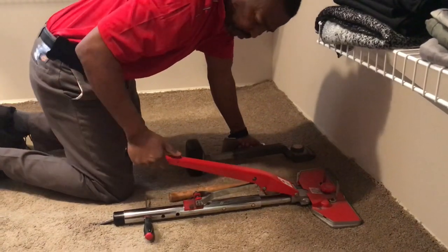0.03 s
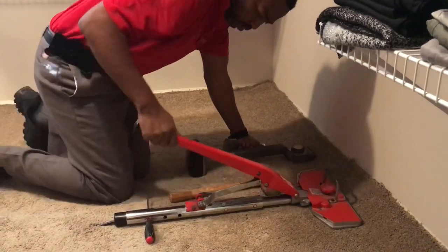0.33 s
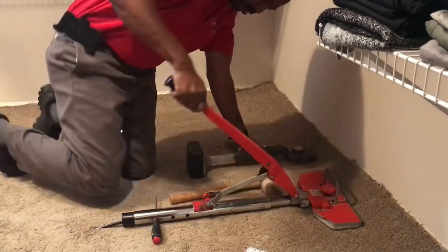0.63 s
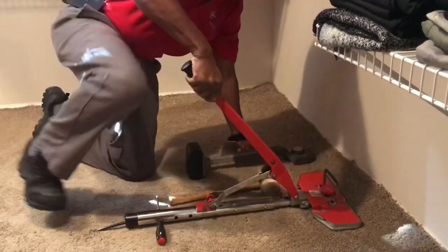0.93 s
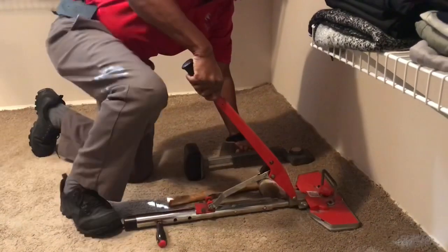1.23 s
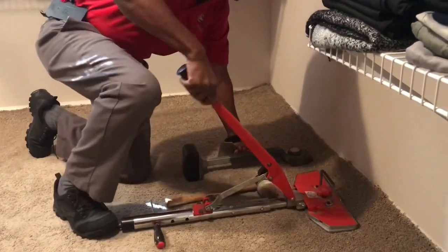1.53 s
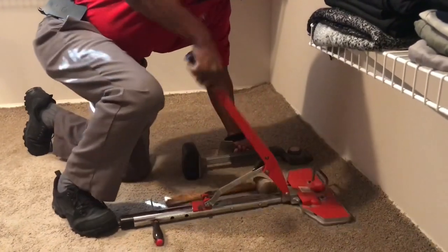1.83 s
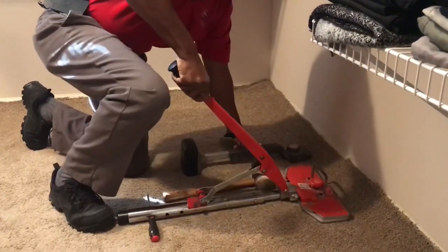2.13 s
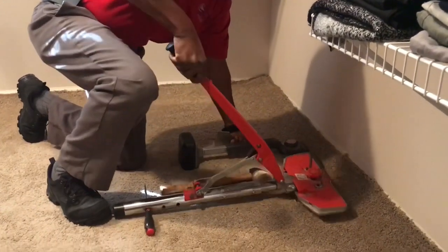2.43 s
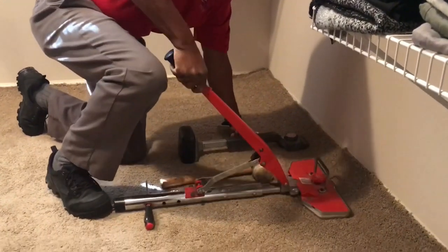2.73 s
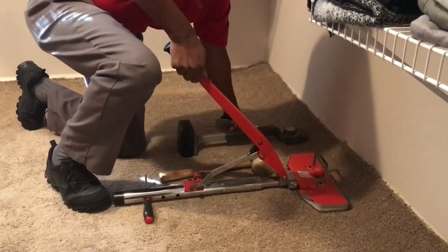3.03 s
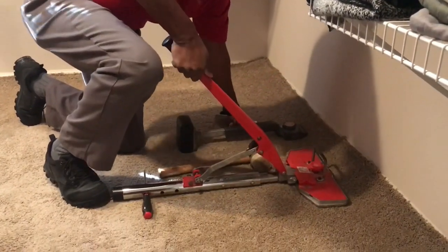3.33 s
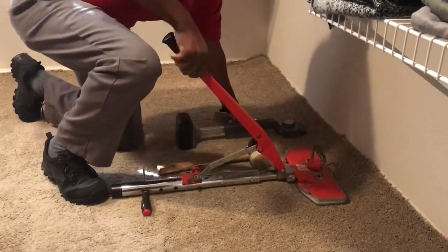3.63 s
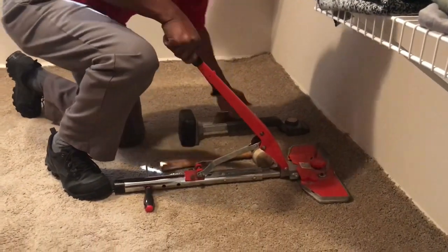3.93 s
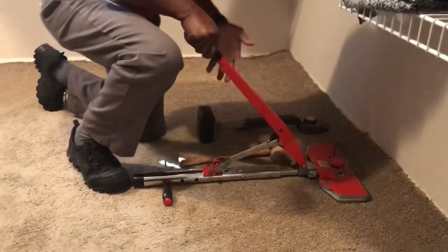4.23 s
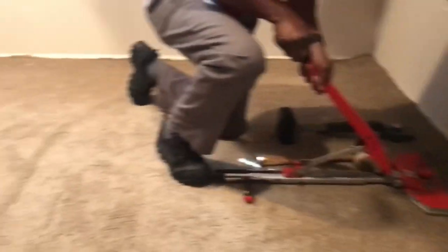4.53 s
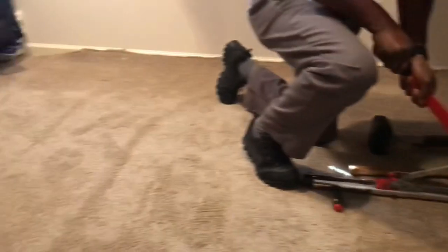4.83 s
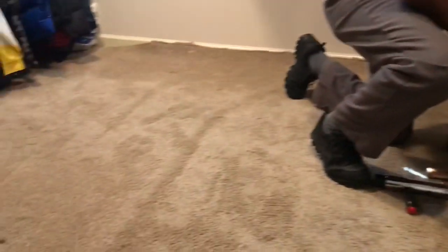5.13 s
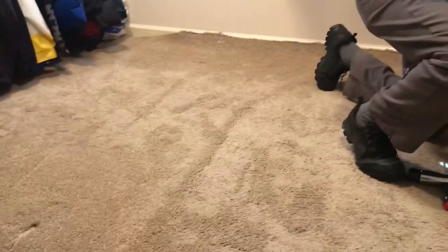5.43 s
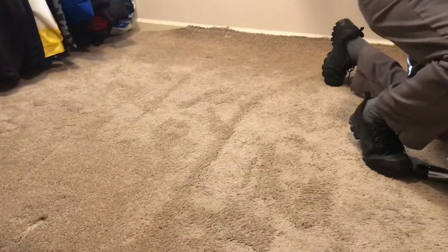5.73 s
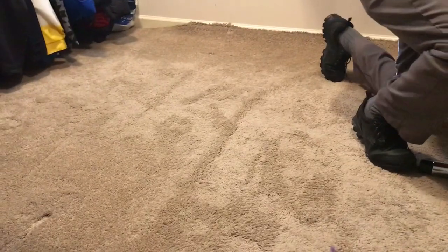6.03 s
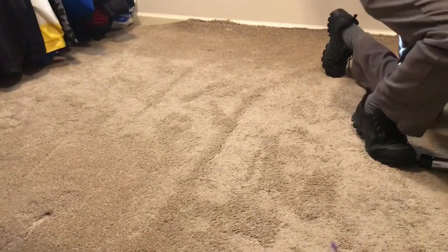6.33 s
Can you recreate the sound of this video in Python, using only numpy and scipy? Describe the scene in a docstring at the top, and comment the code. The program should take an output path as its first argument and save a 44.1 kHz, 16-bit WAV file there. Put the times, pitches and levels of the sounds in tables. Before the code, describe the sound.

A carpet stretcher is pumped in a small room, with irregular metal clicks, two heavy clacking floor thumps and a lever clang.

```python
"""Pumping a carpet stretcher

A carpet power stretcher is set and its lever pumped in a small, dead room. Steel joints click and
rattle, the toothed head slams down and thumps the floor, and the lever clangs on its stop. Each hit
is a gritty crack over ringing modes. Dry pivots stick and slip in tiny squeaks, and the kneeling
worker shifts his weight with a low rumble and a rustle of cloth, over a faint hiss."""
import sys
import numpy as np
from scipy import signal
from scipy.fft import rfft, irfft, next_fast_len
from scipy.io import wavfile
from scipy.ndimage import uniform_filter1d

SR = 44100
rng = np.random.default_rng(int(sys.argv[2]) if len(sys.argv) > 2 else 0)


def wav_record(signal):
    """Record a signal, one row per channel, as 16-bit PCM in the file named by sys.argv[1]."""
    frames = np.transpose(np.atleast_2d(signal))
    bounded = np.clip(frames, -1, 1)
    # unit amplitude maps onto the largest positive 16-bit level
    quanta = np.round(bounded * 32767).astype(np.int16)
    wavfile.write(sys.argv[1], SR, quanta)


N = 282240
HIT_SAMPLES = 18000
AGE = np.arange(HIT_SAMPLES) / SR  # seconds into a hit
BASS_CUT_HZ, TOP_HZ = 36, 16100

# Hit cues: t/s, relative level/dB, brightness/(dB per octave)
LINK_CLICKS = [(1.289, -41.5, -4.5), (1.3108, -35, 3), (1.3475, -36, -0.5), (1.3645, -53, 0),
               (1.377, -47, -2.5), (1.4, -59.5, -4), (1.464, -53, -5), (1.481, -43, -3), (1.584, -51, -6),
               (1.6195, -50.5, -0.5), (1.6495, -52.5, -3.5), (1.6635, -47.5, -6), (1.7075, -47.5, -7),
               (1.773, -43.5, -1.5), (1.781, -39, -3), (1.9015, -53, -5), (1.9225, -43.5, -4),
               (2.2555, -48.5, -4.5), (2.284, -61, 0), (2.294, -52.5, -5), (2.329, -45.5, -5),
               (2.356, -54, -1.56), (3.359, -63.5, -6), (3.376, -58.5, -5.5), (3.4485, -34, 0.3),
               (3.457, -36.5, 0.5), (3.621, -57.5, -4.5), (3.6305, -30, 1.5), (3.636, -32.5, 5),
               (4.842, -61.5, 4), (4.951, -44, -4), (5.079, -45, -3.5)]  # the linkage takes up its slack
TUBE_CLICKS = [(4.388, -53, -2.7), (4.453, -37, 0), (4.9535, -28, 0.5), (5.0815, -28, .2)]  # the telescoping tube knocks against its lock pin
HEAD_CLACKS = [(1.746, -37.5, -3.5), (1.938, -49, -1), (1.943, -31, 3.5), (1.946, -22, 0), (1.966, -34, 3),
               (1.984, -34.5, 0), (1.9985, -39.5, 2.5), (2.616, -48, 0.5), (2.62, -20, .6),
               (2.635, -29.5, 4.5), (2.651, -39, 1)]  # the toothed head drops and bites
LEVER_CLANGS = [(4.163, -22.6, -.5), (4.2, -39.5, -1.2)]  # the lever hits its stop and bounces
PADDED_KNOCKS = [(0.247, -47.5, -3.5), (0.265, -43, 1.5), (0.348, -54, -5.5), (0.405, -59.5, -0.5),
                 (0.669, -55, -4), (0.722, -61, 2), (0.955, -59.5, 1.5), (1.282, -43, -9.5),
                 (1.6, -47, -5.5), (2.058, -50, -6.5), (2.83, -60, -7), (3.727, -59, -4.5),
                 (4.559, -51.5, -7.5), (4.641, -51, -5.5), (4.709, -54.5, -9.5), (4.87, -57, -4.5),
                 (5.162, -65, -2.5), (5.341, -49.5, -3.5), (5.64, -59.5, -0.5), (5.693, -61.5, -3.5),
                 (5.866, -66.5, 3), (6.263, -60.5, -5)]  # hand, knee and shoe on the tool

# Colour of each part's crack: f/Hz, level/dB
LINK_CRACK = [(180, -22), (300, 0.5), (372, -23.5), (678, -7.5), (787, -22), (1040, -6.5), (1390, -10),
              (1620, -3), (1900, -6), (2210, -1.5), (3000, -3.5), (4830, -4.5), (5160, -4), (7200, -6.5),
              (8940, -4), (10400, -18), (11300, -12), (16000, -23.5)]
TUBE_CRACK = [(240, -52), (400, -28), (489, -30.5), (921, -19), (1310, -32), (1510, -11), (2090, -16.5),
              (2800, -10.5), (3160, -16), (4110, -7), (4650, -11), (6640, -13.5), (8240, -4.5),
              (10200, -15), (16000, -31)]
HEAD_CRACK = [(180, -32.5), (300, 0.5), (385, -1), (447, -11.5), (614, -1), (856, -7.5), (1000, 2),
              (1200, 4), (1500, -2), (2070, -5), (2570, -4), (2880, -7.5), (4090, -9), (7080, -14.5),
              (10200, -23.5), (12700, -22), (16000, -32.5)]
LEVER_CRACK = [(150, -48), (250, -22), (380, -26.5), (540, -15), (680, -3), (900, -12.5), (1100, -0.5),
               (1700, 1.5), (2400, -10.5), (3980, -4.5), (4820, -8.5), (5250, -2), (5930, -7), (12100, -14),
               (13000, -13), (16000, -29.5)]
KNOCK_CRACK = [(210, -23), (350, -5.5), (649, -20), (769, -14.5), (984, -9.5), (1770, -8.5), (2350, -4),
               (2950, -7), (5460, -20), (6370, -12), (6880, -19.5), (14000, -38.5)]

# Ring of each part and of the floorboards: f/Hz, relative level/dB, t60/s
LINK_MODES = [(1078, -11, 0.11), (1717, -12.5, 0.12), (2210, -4.5, 0.069), (2600, -5, 0.073),
              (3320, -6, 0.048), (4210, -7.5, .14), (5370, -10.5, .09), (5650, -3.5, 0.048),
              (5950, -3, 0.07), (6500, -7.5, 0.088), (7908, -15.5, .08), (8930, -3, 0.1),
              (10940, -3.5, 0.054), (12490, -13, .06), (14700, -11, .08)]
TUBE_MODES = [(1155, -6, 0.049), (1488, -17, 0.093), (2860, -9.5, 0.088), (4170, -10.5, 0.17),
              (4310, 4.5, 0.063), (5200, -6, 0.08), (6070, -4, 0.072), (6900, -10, 0.12), (8240, 3, 0.079),
              (8450, -11, 0.13), (9300, -2.5, 0.062), (11090, -17, 0.13)]
HEAD_MODES = [(590, 2, 0.1), (1205, 3, 0.14), (1450, -5, 0.087), (1970, -3, 0.087), (4200, 1, 0.058),
              (4600, -1.5, 0.058), (4560, -6, 0.057), (4940, -11, 0.062), (5690, -11.5, 0.1),
              (6260, -5, 0.077), (6700, -9, 0.089), (6900, -8, 0.059)]
KNOCK_MODES = [(232.8, -8.5, 0.12), (606, -5, 0.083), (986, -8, 0.083), (1236, -0.5, 0.036),
               (2097, -1.5, 0.036), (2386, -2, 0.065), (3530, -13, 0.048), (4328, -21, 0.038)]
FLOOR_MODES = [(48.3, -3, 0.54), (92, -7.5, 0.8), (156, -4, .22), (207, -4.5, 0.11), (277, -17.5, 0.18),
               (329, -18, 0.23)]
# Ring of the long lever arm: f/Hz, level/dB, t60 swinging free/s, t60 seated on the stop/s
LEVER_ARM_MODES = [(1283, -29.5, 0.13, 0.095), (1515, -37, .15, 0.14), (2540, -38, 0.25, 0.15),
                   (2832, -18.5, .14, 0.055), (3188, -31, 0.53, 0.18), (4270, -32, 0.4, 0.14),
                   (4500, -32.5, .6, .075), (6300, -38.5, .25, 0.08), (8700, -46, .3, .06),
                   (8882, -43, .3, .07)]

# Weight landing on the carpet: t/s, thud level/dB, thud f/Hz, sway level/dB, sway lag/s
FLOOR_THUMPS = [(0.267, -34, 180, -52, 0.0055), (0.484, -42.5, 260, -55, 0.015),
                (0.578, -48, 200, -41.5, 0.0026), (0.794, -46.5, 200, -41.5, 0.0032),
                (1.282, -35.5, 200, -23, .026), (1.662, -33, 145, -36, 0.0039),
                (1.782, -39, 175, -34, 0.0042), (1.946, -17.5, 104, -21.5, 0.031),
                (1.995, -23.5, 165, -29, 0.048), (2.334, -38.5, 190, -35, 0.043),
                (2.624, -15.5, 163.6, -17.5, 0.011), (2.653, -23.5, 111, -35.5, .06),
                (3.631, -46.5, 301, -57, 0.0045), (3.845, -50.5, 125, -50, 0.033),
                (4.166, -40, 172, -46.5, .002), (4.954, -46.5, 280, -53.5, 0.0046),
                (5.072, -42.5, 215, -36.5, .002), (5.998, -50.5, 292, -63, .01),
                (6.291, -52, 110, -52, 0.0046)]
# Dry pivots: centre t/s, relative level/dB, f/Hz, half length/s, overtones re the fundamental/dB
PIVOT_SQUEAKS = [(2.001, -39, 12100, .003, -30), (2.053, -36.5, 1320, 0.0037, -22),
                 (2.256, -33, 9200, 0.004, -40), (2.278, -56, 9140, 0.0098, -21.5),
                 (2.301, -48.5, 8470, 0.0082, -30), (2.585, -31, 3846, 0.0042, -19)]
# The worker's moves: t/s, length/s, rumble level/dB, scuff level/dB, cloth level/dB
WORKER_MOVES = [(0.12, .12, -67, -66, -67), (0.242, .17, -61, -52.5, -64.5), (0.489, .14, -60, -62, -58.5),
                (0.66, 0.18, -55.5, -58, -65), (0.905, 0.4, -60.5, -92, -69),
                (1.327, 0.22, -49, -57.5, -69), (1.626, .17, -49.5, -49, -57),
                (1.845, 0.24, -48.5, -58, -72.5), (2.279, 0.097, -51.5, -51.5, -74.5),
                (2.655, 0.038, -49.5, -51, -69.5), (3.961, 0.073, -70.5, -73, -65.5),
                (4.19, 0.082, -59.5, -59.5, -79.5), (4.912, 0.14, -54.5, -48, -64.5),
                (5.944, .3, -75, -80, -65.5)]

# Colours of the noise layers: f/Hz, level/dB
RUMBLE_COLOUR = [(15, -30), (28, -6), (45, 7), (70, 3.5), (110, -10), (200, -56)]  # the loaded floor
SCUFF_COLOUR = [(30, -44.5), (60, -24), (110, 1), (150, 2.5), (290, -5.5), (420, -15.5), (700, -45.5)]  # crushed padding
CLOTH_COLOUR = [(240, -27), (400, -1), (770, -5), (1200, -3.5), (1500, -6.5), (2300, -8), (2850, -5),
                (3500, -10.5), (4800, -14), (5320, -13.5), (14000, -24.5)]  # cloth on the pile
HISS_COLOUR = [(59, -32), (100, -3), (189, -5), (224, -14.5), (260, -6), (406, -18.5), (442, -14.5),
               (991, -17.5), (1080, -18), (1800, -22), (10200, -30), (14400, -25.5), (16000, -30.5)]  # the steady bed

# Early reflections off floor, corner and shelf: delay t/s, relative gain
ECHOES = [(.0023, 0.26), (.0062, .25), (.0085, 0.23), (0.0104, .3), (0.017, .15)]
# The room's short tail: f/Hz, t60/s
ROOM_T60 = [(200, 0.19), (1000, 0.13), (3000, 0.08), (8000, 0.051), (16000, .075)]


def stretcher(level_db=.5):
    """The lead layer: the tool's struck parts crack and ring, and the lever arm sings on."""
    link = hits(LINK_CLICKS, LINK_CRACK, LINK_MODES, rise_s=.0005, chatter_s=.003, chatter_growth=.11,
                grit=.2, ring_db=-8, ring_loss=.05, tail_db=-4, echo_db=-7)
    tube = hits(TUBE_CLICKS, TUBE_CRACK, TUBE_MODES, rise_s=.0011, chatter_s=.0027, chatter_growth=.55,
                grit=.5, ring_db=0, ring_loss=.29, tail_db=-1.5, echo_db=-7.5)
    head = hits(HEAD_CLACKS, HEAD_CRACK, HEAD_MODES, rise_s=.0015, chatter_s=.0054, chatter_growth=.15,
                grit=.41, ring_db=-8, ring_loss=.1, tail_db=-6, echo_db=-5)
    lever = hits(LEVER_CLANGS, LEVER_CRACK, LINK_MODES, rise_s=.0012, chatter_s=.0025,
                 chatter_growth=.02, grit=.29, ring_db=-9.5, ring_loss=.02, tail_db=-6.5, echo_db=-5)
    knocks = hits(PADDED_KNOCKS, KNOCK_CRACK, KNOCK_MODES, rise_s=.0011, chatter_s=.0019,
                  chatter_growth=.02, grit=.27, ring_db=-4, ring_loss=.11, tail_db=-3.5, echo_db=-6)
    return gain_of(level_db) * (link + tube + head + lever + knocks) + lever_ring()


def hits(cues, crack_colour, modes, rise_s, chatter_s, chatter_growth, grit, ring_db, ring_loss,
         tail_db, echo_db, medium_hit_db=-40, spot_db=2, rms_window_s=.025):
    """Loose parts chatter, then ring; a harder hit chatters longer and has more crack than ring."""
    out = np.zeros(N)
    attack = 1 - np.exp(-(AGE / rise_s) ** 2)
    for s, db, brightness in cues:
        force_db = db - medium_hit_db
        contacts = rng.standard_normal(HIT_SAMPLES)
        roughness = unit_rms(uniform_filter1d(rng.standard_normal(HIT_SAMPLES), 30))
        decay = np.exp(-AGE / (chatter_s * gain_of(chatter_growth * force_db)))
        chatter = contacts * np.exp(grit * roughness) * attack * decay
        chatter_in_room = signal.fftconvolve(chatter, room(tail_db, echo_db))[:HIT_SAMPLES]
        crack = unit_rms(coloured(chatter_in_room, crack_colour))
        # the spot that is struck favours some modes over others
        struck_modes = np.array(modes, float)
        struck_modes[:, 1] += spot_db * rng.standard_normal(len(modes))
        ring = gain_of(ring_db - ring_loss * force_db) * attack * ringing(struck_modes)
        hit = contact_tilt(crack + ring, brightness)
        add(out, s, gain_of(db) * hit * np.sqrt(rms_window_s * SR / np.sum(hit ** 2)))
    return out


def ringing(modes, spread=.0042, twin_split=.009, twin_db=-5.5):
    """No part is quite symmetric: each dying mode beats with a close, weaker twin."""
    hz, db, t60 = np.transpose(modes)[:, :, None]
    detune, phase, split, twin_phase = rng.uniform(-1, 1, (4, len(modes), 1))
    angle = 2 * np.pi * hz * (1 + spread * detune) * AGE
    main = np.sin(angle + np.pi * phase)
    twin = gain_of(twin_db) * np.sin(angle * (1 + twin_split * split) + np.pi * twin_phase)
    return unit_rms((gain_of(db - 60 * AGE / t60) * (main + twin)).sum(0))


def contact_tilt(x, db_per_octave, from_hz=650, to_hz=11000):
    """Tilts the treble: hard contacts are bright, padded ones dull."""
    return coloured(x, [(from_hz, 0), (to_hz, db_per_octave * np.log2(to_hz / from_hz))])


def lever_ring(start_s=4.164, seated_s=4.212, rise_s=.005):
    """The lever sings while it rebounds and is choked when it settles on the stop."""
    out = np.zeros(N)
    time_free = np.minimum(AGE, seated_s - start_s)
    time_seated = AGE - time_free
    attack = 1 - np.exp(-AGE / rise_s)
    for hz, db, free_t60, seated_t60 in LEVER_ARM_MODES:
        decay = gain_of(db - 60 * time_free / free_t60 - 60 * time_seated / seated_t60)
        add(out, start_s, attack * decay * np.sin(2 * np.pi * (hz * AGE + rng.random())))
    return out


def floor_thumps(sway_hz=53.5, knock_hz=166.7, knock_db=-2, thud_per_dullness=1.8):
    """The low end: heavy loads thud and make the floor sway; light knocks only thud."""
    out = np.zeros(N)
    for s, thud_db, thud_hz, sway_db, lag_s in FLOOR_THUMPS:
        add(out, s, gain_of(thud_db) * floor_swing(thud_hz))
        sway = floor_swing(sway_hz, rise_s=.0062, t60=.22, pad_db=-15)
        add(out, s + lag_s, gain_of(sway_db) * sway)
    for s, db, brightness in PADDED_KNOCKS:
        thud_db = db + knock_db - thud_per_dullness * brightness  # duller knocks thud more
        add(out, s, gain_of(thud_db) * floor_swing(knock_hz))
    return out


def floor_swing(hz, rise_s=.0055, t60=.085, pad_db=-7, boards_db=-27):
    """A load swings the floor at one pitch, crushes the padding and sets the boards ringing."""
    attack = np.sin(np.pi / 2 * np.minimum(AGE / rise_s, 1)) ** 2
    decay = gain_of(-60 * np.maximum(AGE - rise_s, 0) / t60)
    body = np.sin(2 * np.pi * hz * AGE)
    padding = gain_of(pad_db) * unit_rms(coloured(rng.standard_normal(HIT_SAMPLES), SCUFF_COLOUR))
    boards = gain_of(boards_db) * ringing(FLOOR_MODES, spread=.029)
    return attack * (decay * (body + padding) + boards)


def pivot_squeaks(jitter=.028, flutter=.35, level_db=-2):
    """Steel sticks and slips in a pivot: a brief, rough, unsteady tone with overtones."""
    out = np.zeros(N)
    centre_s = AGE.mean()
    for s, db, hz, half_s, overtones_db in PIVOT_SQUEAKS:
        wander, grip = unit_rms(uniform_filter1d(rng.standard_normal((2, HIT_SAMPLES)), 20))
        cycles = np.cumsum(hz * (1 + jitter * wander)) / SR
        tone = sum(gain_of(overtones_db * (k > 1)) * np.sin(2 * np.pi * k * cycles)
                   for k in range(1, 5) if k * hz < TOP_HZ)
        swell = np.exp(-((AGE - centre_s) / half_s) ** 2)
        add(out, s - centre_s, gain_of(db) * tone * (1 + flutter * grip) * swell)
    return gain_of(level_db) * signal.oaconvolve(out, room())[:N]


def worker(attack_s=.042, release_t60=.33, catch_db=3, idle_rumble_db=-67, idle_scuff_db=-75):
    """Body foley: knees and shoes load the floor, cloth catches on the pile in uneven grains."""
    t = np.arange(N) / SR
    power = np.zeros((3, N))
    for start, length, *layer_db in WORKER_MOVES:
        attack = np.clip((t - start) / attack_s, 0, 1)
        release = gain_of(-60 * np.maximum(t - start - length, 0) / release_t60)
        power += np.outer(gain_of(layer_db), attack * release) ** 2
    rumble_gain, scuff_gain, cloth_gain = np.sqrt(power)
    catches = gain_of(catch_db * unit_rms(uniform_filter1d(rng.standard_normal(N), 200)))
    # the kneeling worker is never quite still
    rumble = np.hypot(rumble_gain, gain_of(idle_rumble_db)) * noise(RUMBLE_COLOUR)
    scuff = np.hypot(scuff_gain, gain_of(idle_scuff_db)) * noise(SCUFF_COLOUR)
    rustle = cloth_gain * unit_rms(catches * noise(CLOTH_COLOUR))
    return rumble + scuff + rustle


def room(tail_db=-4, echo_db=0, build_s=.0031):
    """Direct sound, a few close echoes and a short tail soaked up by carpet and clothes."""
    hz, t, bands = signal.stft(rng.standard_normal(HIT_SAMPLES), SR, nperseg=128)
    decay = gain_of(-60 * t / curve_at(ROOM_T60, hz)[:, None])
    tail = signal.istft(bands * decay, SR, nperseg=128)[1][:HIT_SAMPLES]
    tail *= 1 - np.exp(-(AGE / build_s) ** 2)
    response = gain_of(tail_db) * tail / np.linalg.norm(tail)
    response[0] += 1
    for s, gain in ECHOES:
        add(response, s, gain_of([echo_db]) * gain)
    return response


def noise(colour):
    """Steady coloured noise of rms 1."""
    return unit_rms(coloured(rng.standard_normal(N), colour))


def coloured(x, colour):
    """Minimum-phase EQ along an (f/Hz, level/dB) curve, so that attacks stay sharp."""
    size = next_fast_len(len(x) + 4096)
    log_gain = np.log(gain_of(curve_at(colour, abs(np.fft.fftfreq(size, 1 / SR)))))
    response = np.exp(np.conj(signal.hilbert(log_gain)))[:size // 2 + 1]
    return irfft(rfft(x, size) * response, size)[:len(x)]


def curve_at(points, hz):
    """Reads a curve on a log-frequency axis."""
    f, value = np.transpose(points)
    return np.interp(np.log(hz + 1), np.log(f + 1), value)


def gain_of(db):
    """Decibels to amplitude."""
    return 10 ** (np.asarray(db) / 20)


def unit_rms(x):
    """Scales to rms 1."""
    return x / np.sqrt(np.mean(x ** 2) + 1e-20)


def add(mix, s, sound):
    """Mixes a sound in at time s."""
    part = mix[max(round(s * SR), 0):][:len(sound)]
    part += sound[:len(part)]


def scene(hiss_db=-66.5):
    """The mono mix: tool, floor and worker over a faint, steady bed of hiss."""
    action = stretcher() + floor_thumps() + pivot_squeaks() + worker()
    return (action + gain_of(hiss_db) * noise(HISS_COLOUR))[None]


def record(dry):
    """The microphone rolls off the deep bass, and a steep low-pass trims the very top."""
    bass_cut = signal.butter(3, BASS_CUT_HZ, "high", fs=SR, output="sos")
    top_cut = signal.firwin(255, TOP_HZ, window=("kaiser", 8), fs=SR)
    return signal.oaconvolve(signal.sosfilt(bass_cut, dry), top_cut[None], "same")


dry = scene()
out = record(dry)
wav_record(out)
```